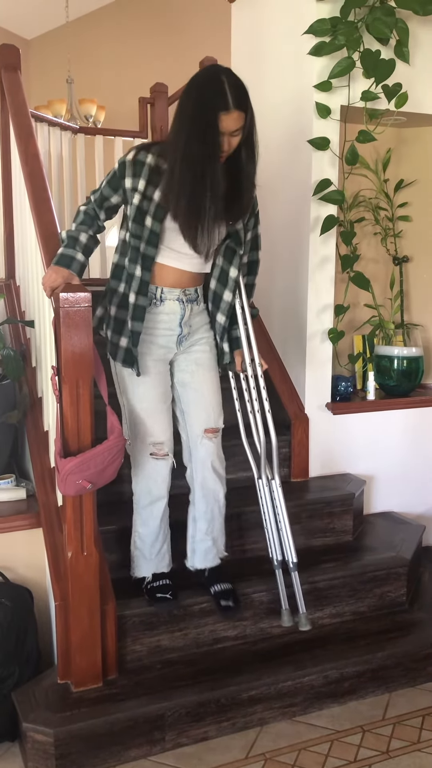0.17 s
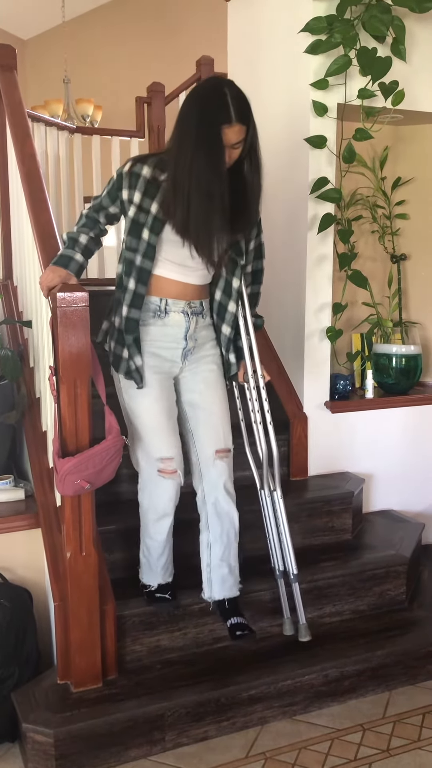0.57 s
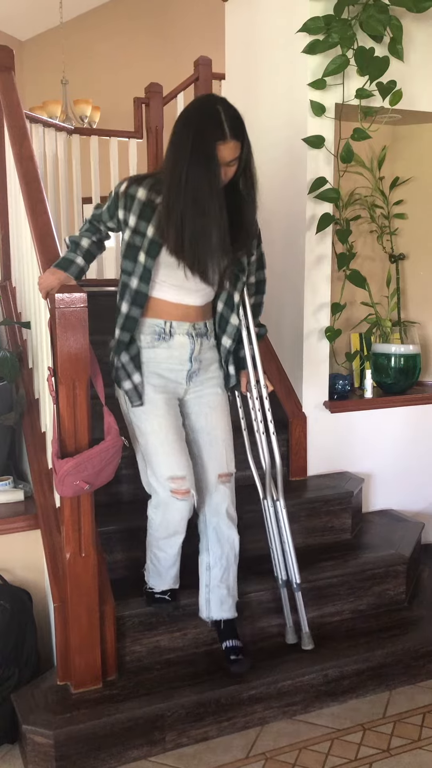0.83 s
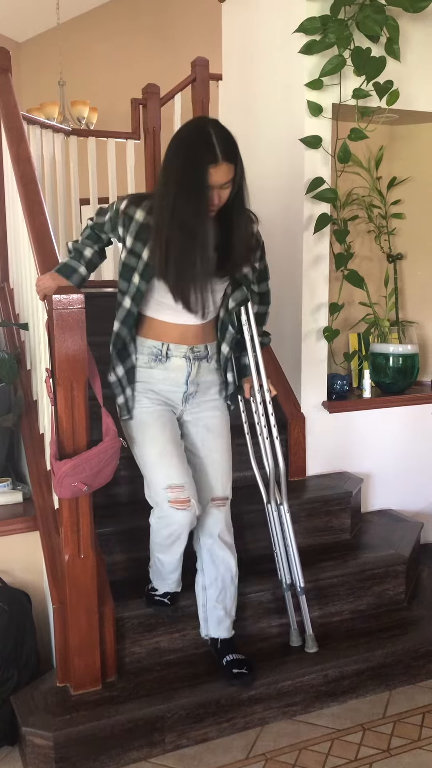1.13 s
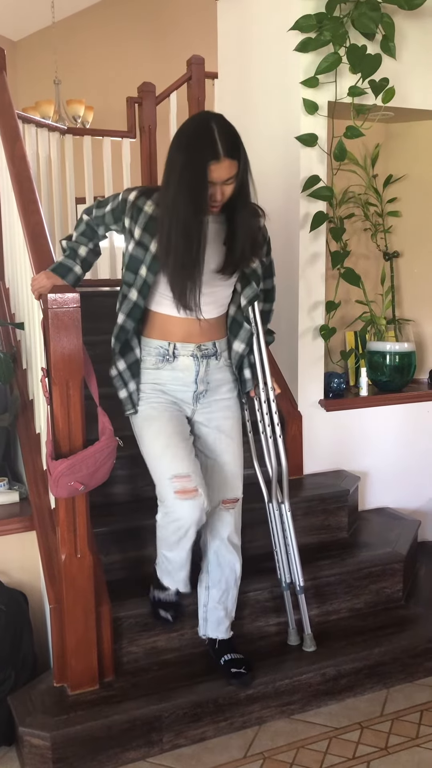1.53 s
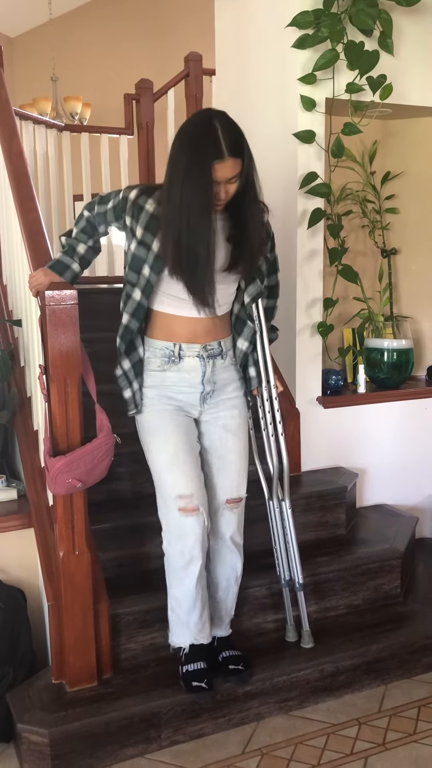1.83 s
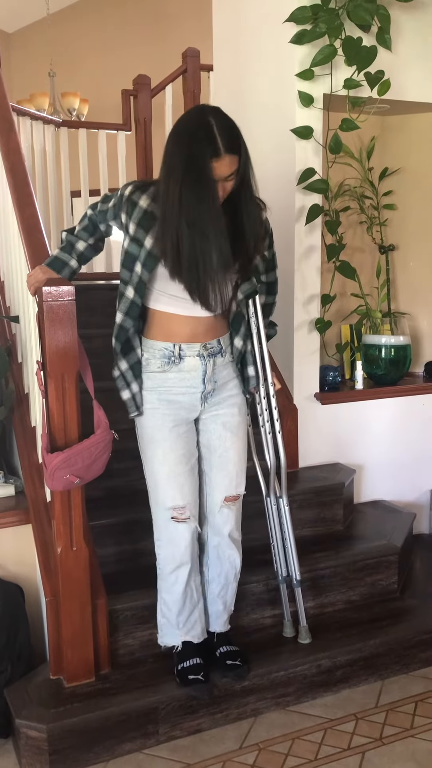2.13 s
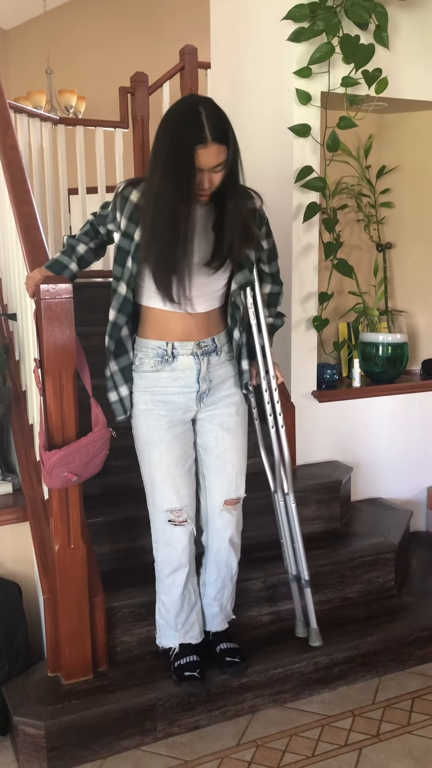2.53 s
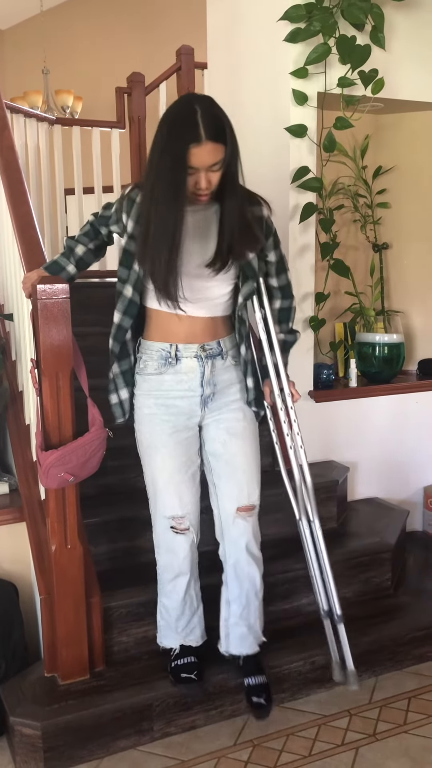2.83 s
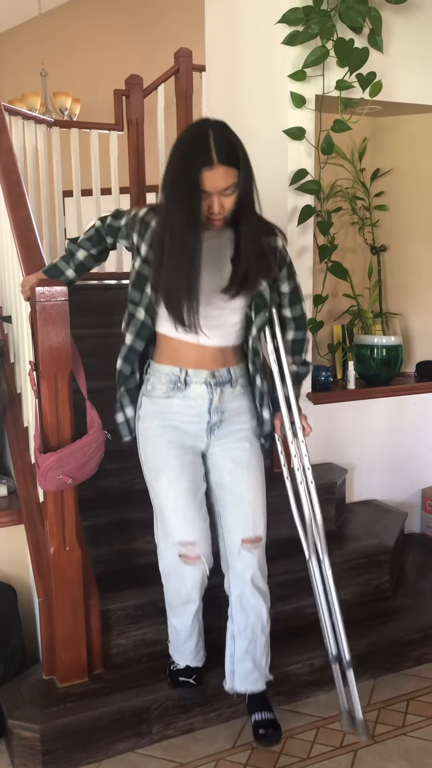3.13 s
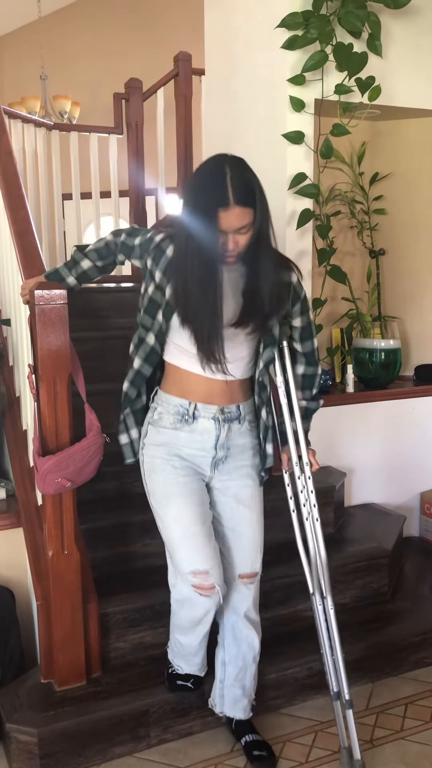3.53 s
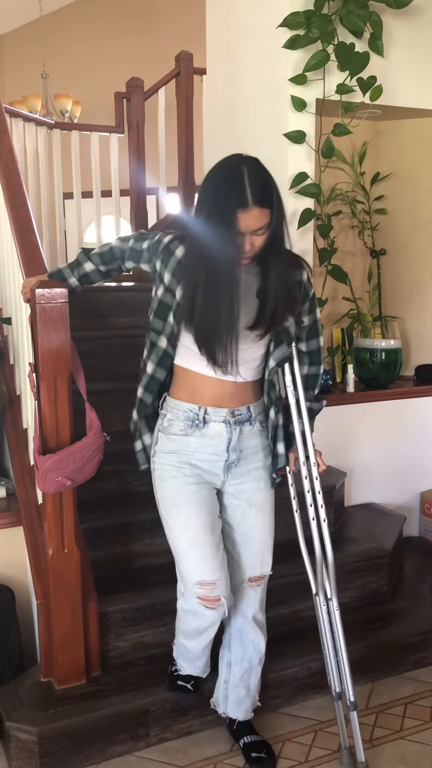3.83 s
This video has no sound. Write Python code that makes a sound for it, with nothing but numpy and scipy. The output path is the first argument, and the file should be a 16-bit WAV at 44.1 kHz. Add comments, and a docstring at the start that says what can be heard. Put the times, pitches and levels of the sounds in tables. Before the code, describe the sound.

Someone descends indoor stairs with metal crutches: soft rustling, low thuds and a brief metallic rattle, quieter shuffling and ticks, then a sharp loud clack and pin rattle; quiet reverberant room, mono microphone nearby.

```python
"""A live, faintly humming stairwell hall: someone steps slowly down wooden stairs with aluminium crutches.
Clothes swish and slippers scuff (shaped noise); weight thuds on the treads (damped low sines).
The frames tick; twice the adjusting pins rattle (noise bursts) and the tubes clack (noise and ringing modes).
A rubber tip squeaks faintly near the end (a rough falling sine)."""
import sys
import numpy as np
from scipy import signal
from scipy.fft import rfft, irfft, next_fast_len
from scipy.io import wavfile
from scipy.ndimage import map_coordinates

SR = 44100
rng = np.random.default_rng(int(sys.argv[2]) if len(sys.argv) > 2 else 0)


def materialize(psi):
    """Save the field psi as 16-bit PCM at rate SR to the path in sys.argv[1].

    A 1-D psi becomes a single channel; in a 2-D psi each row is a channel.
    """
    bounded = np.clip(np.atleast_2d(psi).T, -1, 1)
    quanta = np.round(bounded * 32767).astype(np.int16)
    wavfile.write(sys.argv[1], SR, quanta)


N = 176400
T = np.arange(SR) / SR  # one second, the longest single event
TOP_HZ = 15900


def amp(db):
    """Decibels to gain."""
    return 10 ** (np.asarray(db) / 20)


def unit(x):
    """Scale to rms 1."""
    return x / np.sqrt(np.mean(x ** 2) + 1e-20)


def along(points, hz):
    """Interpolate (Hz, value) points on a log frequency axis."""
    point_hz, values = np.transpose(points)
    return np.interp(np.log(hz + 1), np.log(point_hz + 1), values)


def fade(t60_s):
    """Exponential decay, 60 dB in t60_s, over one second."""
    return np.exp(-np.log(1000) * T / np.maximum(t60_s, 1e-3))


def onset(rise_s):
    """Exponential approach to 1 with time constant rise_s, over one second."""
    return 1 - np.exp(-T / rise_s)


def wobble(knots_per_s, size=N):
    """Smooth random curve: a spline through normal random knots."""
    knots = rng.standard_normal(2048)
    return map_coordinates(knots, [np.arange(size) * knots_per_s / SR], mode="wrap")


def noise(colour, tilt_db_per_octave=0, size=SR):
    """Noise of rms 1 with a (Hz, dB) spectrum, tilted above 500 Hz and band-limited."""
    hz = np.fft.rfftfreq(size, 1 / SR)
    octaves = np.log2(np.maximum(hz, 500) / 500)
    gain = amp(along(colour, hz) + tilt_db_per_octave * octaves) * (hz < TOP_HZ)
    return unit(irfft(rfft(rng.standard_normal(size)) * gain, size))


def add(track, start_s, sound):
    """Mix a sound into the track, cut at the track's end."""
    part = track[max(round(start_s * SR), 0):][:len(sound)]
    part += sound[:len(part)]


def hall(x, wet_db, build_s=0.002):
    """Direct sound, a floor bounce and a noise tail whose decay time depends on frequency."""
    # Each row: frequency in Hz, tail decay t60 in s.
    tail_t60 = [(100, 1), (500, 0.69), (1500, 0.76), (4000, 0.66), (8000, 0.48), (15000, 0.52)]
    # Each row: frequency in Hz, tail spectrum in relative dB.
    tail_colour = [(60, 2), (500, 4.5), (2000, 2.5), (5000, 2.5), (9000, -1), (15000, -2.5)]
    floor_echo_s, floor_echo_db = .0044, -15.5

    hz, t, spectrum = signal.stft(rng.standard_normal(SR), SR, nperseg=256)
    decay = np.exp(-np.log(1000) * t / along(tail_t60, hz)[:, None])
    gain = amp(along(tail_colour, hz))[:, None] * decay
    tail = signal.istft(spectrum * gain, SR, nperseg=256)[1][:SR] * onset(build_s)
    response = amp(wet_db) * tail / np.linalg.norm(tail)
    response[0] += 1
    response[round(floor_echo_s * SR)] += amp(floor_echo_db)
    return signal.fftconvolve(x, response)[:len(x)]


def room_tone(waver_rad=0.3, air_db=-60.5):
    """Still air as coloured noise; appliance hum as sines with slowly wandering phase."""
    # Each row: frequency in Hz, rms level in dB.
    hum_lines = [(59.2, -68), (220.7, -73), (355.3, -77), (414.5, -73.5), (532.9, -74)]
    # Each row: frequency in Hz, air spectrum in relative dB.
    air_colour = [(15, -35), (26, -25), (38, -6), (60, -2), (90, -11), (200, -2.5), (320, -8.5),
                  (520, -10.5), (750, -16.5), (1400, -23.5), (2200, -27.5), (3500, -29), (8000, -35),
                  (15500, -38.5)]
    t = np.arange(N) / SR
    hum = np.zeros(N)
    for hz, db in hum_lines:
        phase = 2 * np.pi * hz * t + waver_rad * wobble(5.38)
        hum += amp(db) * np.sqrt(2) * np.sin(phase)
    return hum + amp(air_db) * noise(air_colour, size=N)


def clothes(grain_db=0.5, rise_share=0.4):
    """Cloth slides over cloth: grainy noise swells with a quick rise and a slower fall."""
    # Each row: peak time in s, Gaussian fall in s, peak level in dB.
    swishes = [(.14, 0.07, -64.5), (0.477, 0.073, -65), (.665, 0.048, -65), (.77, 0.15, -64),
               (1.42, 0.13, -74), (1.54, 0.062, -59.5), (1.66, 0.14, -73.5), (1.94, 0.047, -67.5),
               (2.26, 0.078, -65), (2.59, .11, -67.5), (2.77, 0.076, -68), (2.97, 0.05, -75)]
    # Each row: frequency in Hz, cloth spectrum in relative dB.
    cloth_colour = [(200, 11), (800, 3.5), (2000, -1.5), (5000, 1.5), (8000, 0.5), (12000, -1.5),
                    (15500, 2)]
    t = np.arange(N) / SR
    power = np.zeros(N)
    for peak_s, fall_s, db in swishes:
        width_s = np.where(t < peak_s, rise_share * fall_s, fall_s)
        power += amp(db) ** 2 * np.exp(-((t - peak_s) / width_s) ** 2)
    grain = amp(grain_db * wobble(170))
    return hall(np.sqrt(power) * noise(cloth_colour, size=N) * grain, wet_db=-11)


def scuffs(rise_s=0.0015):
    """Slippers and rubber tips rub the treads: dull noise, soon damped."""
    # Each row: start in s, level in dB, decay t60 in s.
    scuff_rows = [(0.179, -49, 0.048), (.31, -47.5, 0.061), (0.339, -55, 0.21), (1.17, -58, 0.13),
                  (1.598, -49, 0.18), (1.63, -57, 0.26), (2.784, -55, 0.049), (3.125, -52.5, .15),
                  (3.388, -37.5, 0.11)]
    # Each row: frequency in Hz, scuff spectrum in relative dB.
    scuff_colour = [(80, 0.5), (250, 0), (560, 1), (750, -12), (1400, -18), (3000, -32.5), (12000, -62)]
    out = np.zeros(N)
    for start_s, db, t60_s in scuff_rows:
        add(out, start_s, amp(db) * noise(scuff_colour) * fade(t60_s) * onset(rise_s))
    return hall(out, wet_db=-6.5)


def frame_ticks(t60_s=0.032):
    """The crutch frames are shifted: faint short noise bursts."""
    # Each row: start in s, level in dB, brightness in dB per octave.
    tick_rows = [(0.302, -58, -6), (.543, -56.5, 2.5), (.553, -55.5, -2), (.635, -57.5, 5.5),
                 (2.278, -56, 3.5), (2.318, -59, -2), (2.344, -54.5, 4), (2.348, -50, 13), (2.356, -48, -3),
                 (2.731, -56.5, 5), (2.74, -55.5, -9), (2.79, -54, -5), (2.835, -58.5, 5),
                 (3.122, -56, -3.5), (3.151, -68, 3), (3.227, -52, 0.5), (3.387, -60, 5), (3.4, -58, 19)]
    # Each row: frequency in Hz, tick spectrum in relative dB before brightness.
    tick_colour = [(200, -16.5), (1400, 4.5), (2100, -0.5), (3000, 1), (4200, -6), (5600, -2), (8000, -19),
                   (15000, -34)]
    out = np.zeros(N)
    for start_s, db, tilt in tick_rows:
        add(out, start_s, amp(db) * noise(tick_colour, tilt) * fade(t60_s))
    return hall(out, wet_db=-3.5)


def thuds(rise_s=0.0021):
    """Weight lands on treads and floor: damped sines with unsteady phase."""
    # Each row: start in s, level in dB, pitch in Hz, decay t60 in s.
    thud_rows = [(0.647, -43, 90.4, 0.21), (0.663, -35.5, 131, 0.1), (0.703, -37, 86.4, 0.23),
                 (.716, -40, 178, 0.073), (.764, -40, 141, 0.1), (.895, -49, 129.6, 0.53),
                 (1.158, -47, 44, 0.44), (1.6, -51.5, 226.6, 0.091), (1.814, -45.5, 147, 0.19),
                 (1.858, -43, 160, 0.14), (1.885, -45.5, 152, 0.11), (3.179, -46.5, 44, 0.27),
                 (3.389, -36.5, 214.5, 0.21), (3.3885, -38.5, 460, 0.062), (3.413, -41, 71, .2),
                 (3.439, -36.5, 197, 0.11), (3.464, -36.5, 97, 0.13), (3.465, -38, 239.4, 0.13),
                 (3.855, -46, 179, 0.11)]
    out = np.zeros(N)
    for start_s, db, hz, t60_s in thud_rows:
        swing = np.sin(2 * np.pi * hz * T + .5 * wobble(71, size=SR))
        add(out, start_s, amp(db) * swing * fade(t60_s) * onset(rise_s))
    return hall(out, wet_db=-19)


def pin_rattle():
    """Adjusting pins knock in their holes: decaying noise clicks."""
    # Each row: start in s, level in dB, brightness in dB per octave, decay t60 in s.
    pin_rows = [(0.8841, -36.5, 1.5, 0.11), (0.932, -39, -3.5, 0.032), (.988, -46.5, 1, 0.022),
                (3.608, -36, -2.5, 0.017), (3.6095, -38.5, -5, 0.023), (3.6231, -34.5, 0, .022)]
    # Each row: frequency in Hz, click spectrum in relative dB before brightness.
    pin_colour = [(200, -14), (1500, -5), (3200, -2), (4600, -5), (5500, 1), (6700, -1), (7700, -7),
                  (9200, 0), (11000, -10), (15500, -9)]
    out = np.zeros(N)
    for start_s, db, tilt, t60_s in pin_rows:
        add(out, start_s, amp(db) * noise(pin_colour, tilt) * fade(t60_s))
    return hall(out, wet_db=-4)


def tube_clacks():
    """Tubes strike: a noise crack, a short buzz of loose parts and unsteady ringing tube modes."""
    # Each row: start in s, level in dB, brightness in dB per octave,
    # ring in dB over ring_db, hollow body in dB over body_db.
    clack_rows = [(0.8929, -36.5, 0, -3, 10), (.8942, -33.5, -2.5, -3.5, -3.5), (0.9294, -38.5, -2, 0, 5.5),
                  (3.462, -21.5, 1, -7, -6), (3.4662, -30, 0, -5, 2.5), (3.6235, -49, -1, -6, 12)]
    # Each row: mode frequency in Hz, relative level in dB before brightness, decay t60 in s.
    tube_modes = [(524, -1, .6), (1150, -6, .25), (1545, -4, .25), (1790, -2, .35), (2078, -7, .3),
                  (2400, -7, .15), (2910, -8, .22), (3890, -10, .3), (4045, -5, .28), (5020, -8, .2),
                  (5650, -8, .25), (8200, -5, .1), (8775, -2, .12), (14025, -2, .08)]
    # Each row: frequency in Hz, crack spectrum in relative dB before brightness.
    clack_colour = [(100, 1), (500, -5.5), (900, 0), (1700, -3), (3300, 0.5), (5500, -4.5), (7000, -4),
                    (9000, 3), (11000, -2), (12800, -2), (15300, -5.5)]
    # Each row: frequency in Hz, hollow body spectrum in relative dB.
    body_colour = [(100, -3), (250, -4.5), (520, -7), (750, -6.5), (1100, -0.5), (1400, -2), (1750, 3),
                   (2150, 5.5), (2700, -24), (6000, -20), (12000, -45)]
    crack_t60_s, buzz_t60_s = 0.0091, 0.073
    buzz_db, ring_db, body_db = -9.5, -20, -10

    out = np.zeros(N)
    for start_s, db, tilt, ring_offset_db, body_offset_db in clack_rows:
        crack = noise(clack_colour, tilt) + amp(body_db + body_offset_db) * noise(body_colour)
        crack = crack * (fade(crack_t60_s) + amp(buzz_db) * fade(buzz_t60_s))
        ring = np.zeros(SR)
        for hz, mode_db, t60_s in tube_modes:
            # phase wanders faster in higher modes
            phase = 2 * np.pi * hz * T + 2 * wobble(.012 * hz + 10, size=SR)
            ring += amp(mode_db + tilt * np.log2(hz / 2000)) * fade(t60_s) * np.sin(phase)
        clack = crack + amp(ring_db + ring_offset_db) * ring
        add(out, start_s, hall(amp(db) * clack, wet_db=-4))
    return out


def squeak(start_s=3.85, length_s=0.12, from_hz=5100, to_hz=4200, db=-76):
    """A rubber tip takes the load: a faint falling sine, raspy from fast pitch jitter."""
    out = np.zeros(N)
    progress = np.minimum(T / length_s, 1)
    jitter = 1 + 0.071 * wobble(1200, size=SR)
    hz = (from_hz + (to_hz - from_hz) * progress) * jitter
    tone = np.sin(2 * np.pi * np.cumsum(hz) / SR)
    add(out, start_s, amp(db) * np.sin(np.pi * progress) * tone)
    return hall(out, wet_db=1)


def scene():
    """Sum of all sources, one channel."""
    steps = scuffs() + thuds()
    crutches = frame_ticks() + pin_rattle() + tube_clacks() + squeak()
    return (room_tone() + clothes() + steps + crutches)[None]


def record(dry, low_cut_hz=34):
    """The recorder cuts the deepest bass and everything from TOP_HZ up."""
    size = next_fast_len(N + SR // 2)
    high_pass = signal.butter(4, low_cut_hz, "high", fs=SR, output="sos")
    dry = signal.sosfilt(high_pass, dry)
    in_band = np.fft.rfftfreq(size, 1 / SR) < TOP_HZ
    return irfft(rfft(dry, size) * in_band, size)[..., :N]


dry = scene()
out = record(dry)
materialize(out)
```